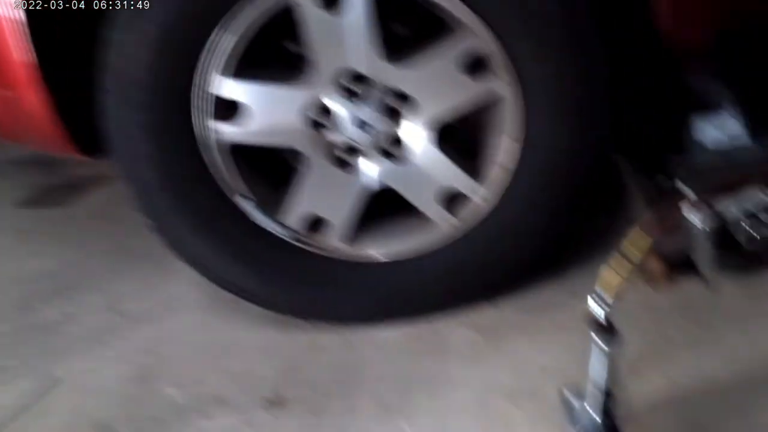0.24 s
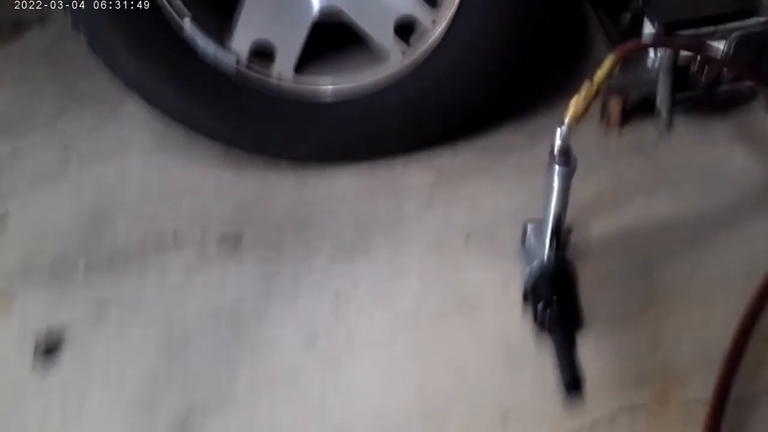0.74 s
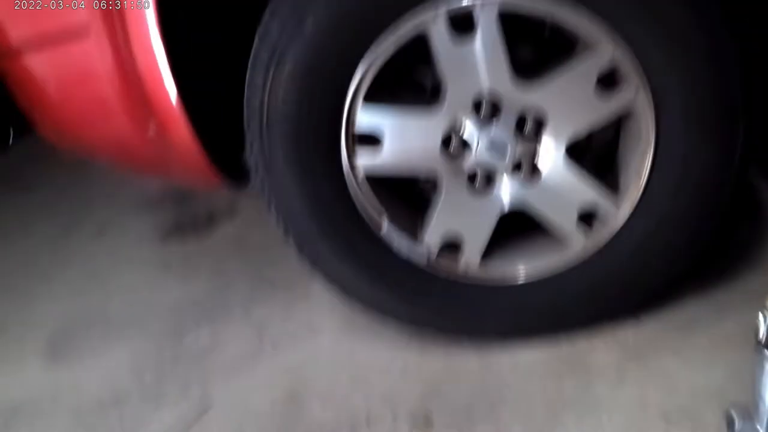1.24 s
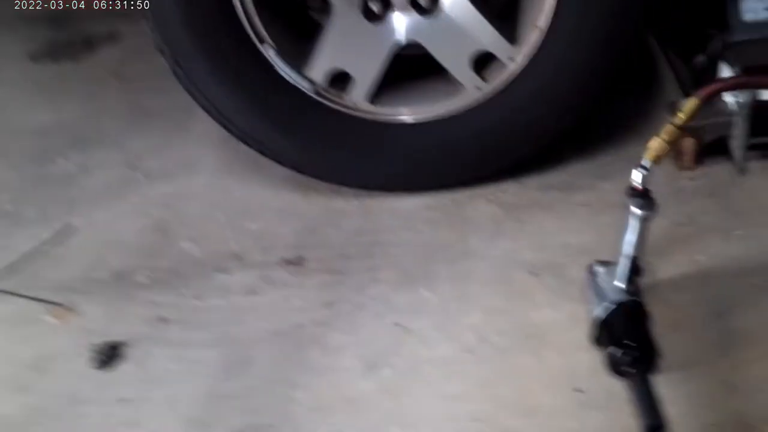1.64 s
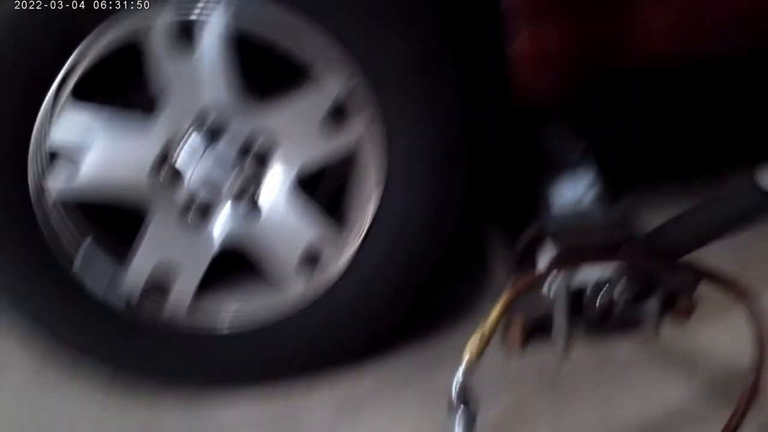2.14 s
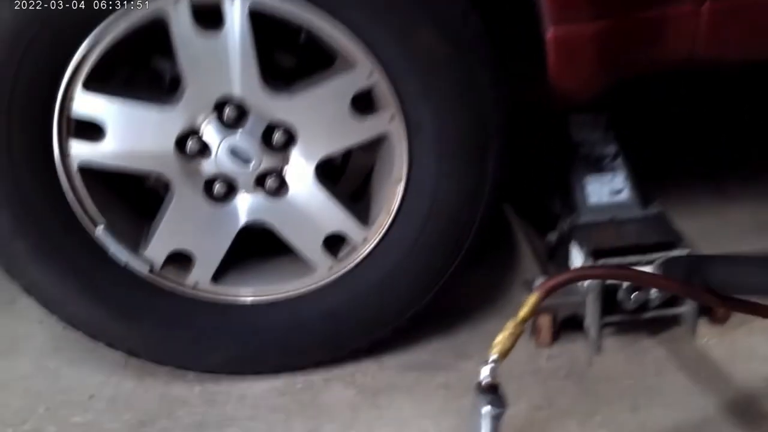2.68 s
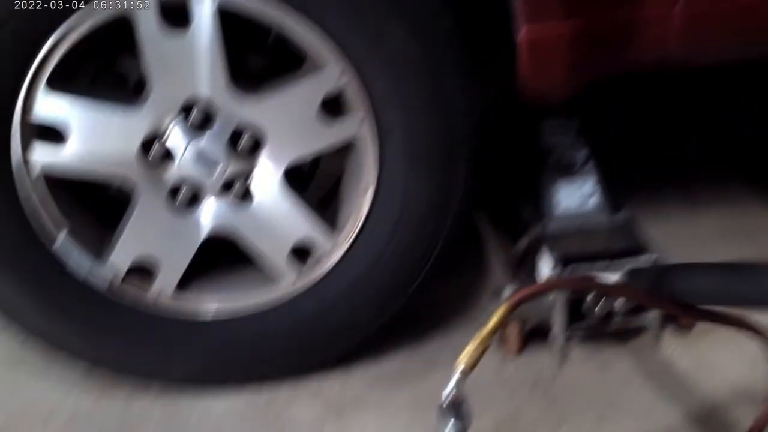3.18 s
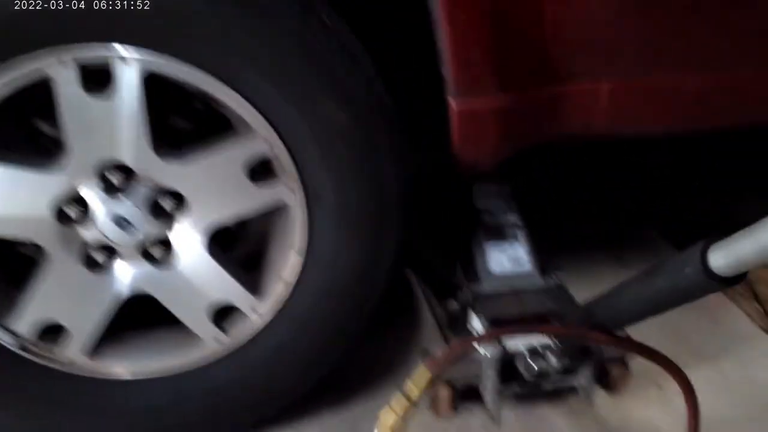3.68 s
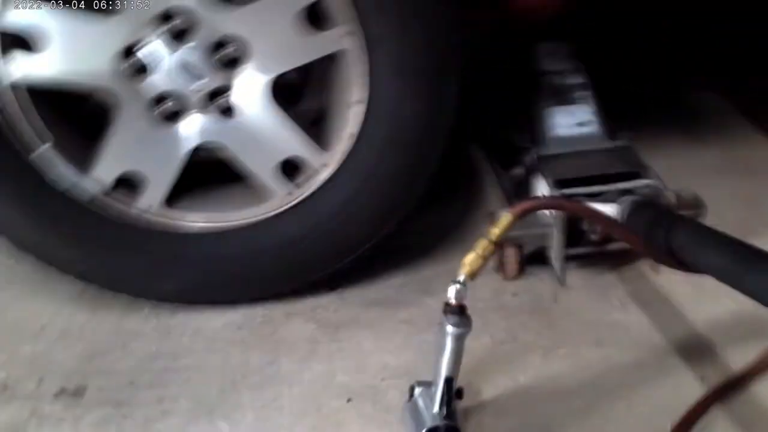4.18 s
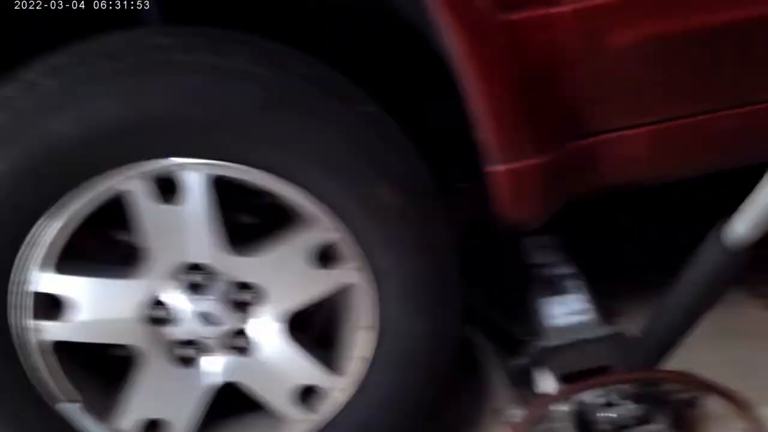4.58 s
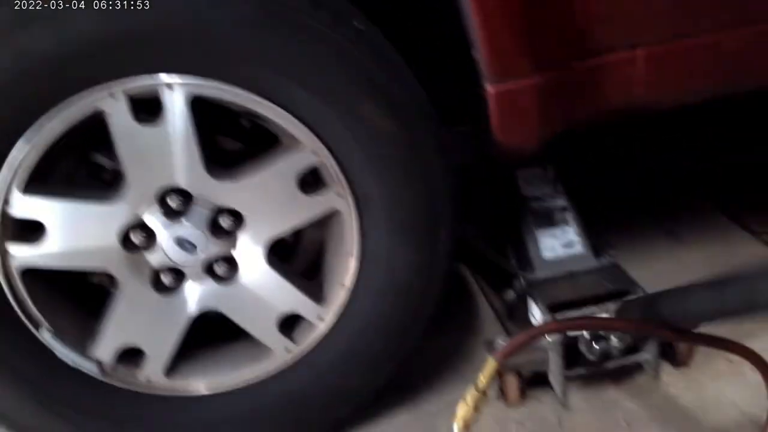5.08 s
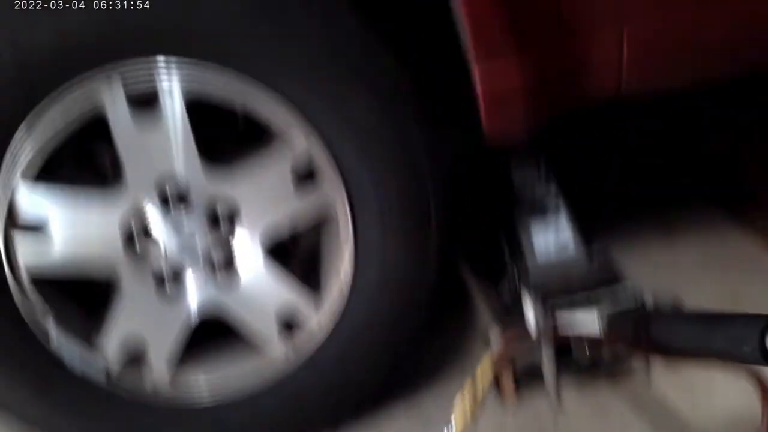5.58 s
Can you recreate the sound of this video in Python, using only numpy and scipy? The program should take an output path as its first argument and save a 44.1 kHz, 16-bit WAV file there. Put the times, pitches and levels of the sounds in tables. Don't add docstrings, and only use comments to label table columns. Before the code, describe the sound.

A hydraulic floor jack is pumped by hand beside a car in a concrete garage, heard close on a small handheld camera. A hollow handle knock opens at 0.1 s, followed by faint dry squeaking from 0.25 to 0.6 s. A soft knock at 0.7, a firm one at 1.25 and a dull one at 1.85 follow, with hand rustle and tiny ticks between. The hardest knock lands at 2.4 s, then light metal catches and a thin squeal until 2.8. Another knock at 3.5 precedes a loud, rapid steel clatter from 3.8 to 4.15 s. A far engine hum swells faintly near 4.3. A knock at 4.75 leads to a second, brighter, rattling burst from 5.0 to 5.3 s with a low thud. A small tick at 5.4 leaves hiss. Bumps are soft, the room tail short, and the treble coarse and unsteady.

```python
import sys
import numpy as np
from scipy import signal
from scipy.fft import rfft, irfft, next_fast_len
from scipy.io import wavfile
from scipy.ndimage import uniform_filter1d

SR = 44100
rng = np.random.default_rng(int(sys.argv[2]) if len(sys.argv) > 2 else 0)


def generate_wav(signal):
    frames = np.transpose(np.atleast_2d(signal))
    scaled = np.clip(frames, -1, 1) * 32767
    pcm = np.round(scaled).astype(np.int16)
    wavfile.write(sys.argv[1], SR, pcm)


def to_linear_factor(level_db):
    exponent = np.asarray(level_db, float) / 20
    return 10 ** exponent


N = 257103
T = np.arange(N) / SR


def unit(x):
    return x / np.sqrt(np.mean(x ** 2))


def noise(grit_db=0.):
    return unit(rng.standard_normal(N) * to_linear_factor(grit_db * rng.exponential(size=N)))


def ring(x, modes):
    out = 0
    for k, (hz, width_hz, db) in enumerate(modes):
        r = np.exp(-np.pi * width_hz / SR)
        poles = [1, -2 * r * np.cos(2 * np.pi * hz / SR), r * r]
        out = out + (-1) ** k * to_linear_factor(db) * (1 - r) * signal.lfilter([1, 0, -1], poles, x)
    return out


def body(x, modes, spread_hz):
    wide = [(hz, width_hz + spread_hz, db) for hz, width_hz, db in modes]
    response = ring(signal.unit_impulse(8192), wide)
    return ring(x, wide) / np.sqrt(np.sum(response ** 2))


def band(x, lo_hz, hi_hz):
    return signal.sosfilt(signal.butter(3, [lo_hz, hi_hz], "bandpass", fs=SR, output="sos"), x)


def column(tables, k, rest):
    out = np.full(N, float(rest))
    for rows in map(np.array, tables):
        on = (T >= rows[0, 0]) & (T <= rows[-1, 0])
        out[on] = np.interp(T[on], rows[:, 0], rows[:, k])
    return out


def gain(tables, k):
    return uniform_filter1d(to_linear_factor(column(tables, k, -120)), size=200)


def walk(rate_hz):
    hold = int(SR / rate_hz)
    return uniform_filter1d(np.repeat(rng.standard_normal(N // hold + 1), hold), hold)[:N]


def add(out, s, piece):
    i = int(s * SR)
    out[i:i + len(piece)] += piece[:N - i]


# start in seconds, peak in dB, ring in Hz, push in seconds,
# level under 1 kHz in dB.
KNOCKS = [
    (0.091, -20.5, 1780, 0.033, -12.5),
    (0.722, -34.5, 1480, 0.065, -11.5),
    (1.251, -18.5, 1780, 0.044, -14.5),
    (1.839, -29.5, 1200, 0.054, -26),
    (2.36, -13.5, 2030, 0.046, -24),
    (3.475, -16, 1354, 0.037, -26.5),
    (4.764, -24, 1440, 0.038, -16.5),
]
# centre in Hz, width in Hz, level in dB.
HANDLE_MODES = [(905, 61, 7.5), (1226, 210, 19.5), (1421, 15, 14), (1780, 10.6, -8), (1990, 90, 9),
                (2300, 41, 19.5), (3120, 140, -22), (4230, 44, -23)]


def knocks():
    out, t, chatter = np.zeros(N), T[:8192], noise(2.0)
    for s, db, hz, push_s, low_db in KNOCKS:
        push = np.exp(-(t / push_s) ** 2 * 2.0) + to_linear_factor(-1.5) * np.exp(-t / 0.026)
        hit = (1 - np.exp(-t / 0.0025)) * push * chatter[int(s * SR):][:8192]
        tube = body(hit, HANDLE_MODES, 27) + to_linear_factor(3.5) * body(hit, [(hz, 500, 0)], 0)
        low = to_linear_factor(low_db + 8.0) * body(hit, [(749, 300, 0)], 0)
        add(out, s - .003, to_linear_factor(db - 10.5) * (tube + low))
    return band(out, 300, 2700) + to_linear_factor(-22.0) * band(out, 2700, 3900)


# start in seconds, peak in dB, ping in Hz, saddle level in dB.
CATCH = [
    (2.6104, -19, 2620, -16),
    (2.6342, -18, 2420, -17),
    (2.6603, -31, 2700, -12),
]
SETTLE = [
    (2.7418, -21, 2440, -9),
]
FIRST_LOAD = [(3.802, -19, 2520, -7), (3.8125, -8, 2600, -6), (3.8292, -15, 2700, -15),
              (3.877, -20, 2430, -16), (3.8862, -12, 2330, -12), (3.9029, -10, 2330, -11),
              (3.916, -5, 2470, -11), (3.9374, -14, 2700, -15), (3.9587, -6, 2610, -23),
              (3.9685, 0, 2630, -25), (3.9818, -1, 2620, -21), (3.9987, 0, 2800, -19),
              (4.009, -5, 3450, -11), (4.0253, -7, 3450, -22), (4.0427, -18, 3600, -17),
              (4.0748, -19, 2660, -15), (4.0947, -13, 2470, -12), (4.1318, -8, 2710, -33)]
SECOND_LOAD = [(5.0214, -23, 2540, -15), (5.0339, -23, 2510, -11), (5.0628, -24, 2790, -15),
               (5.0848, -11, 2550, -19), (5.1102, -14, 2580, -17), (5.1228, -13, 2720, -13),
               (5.1285, -3, 3830, -11), (5.1336, -2, 3770, -13), (5.1387, -2, 3990, -8),
               (5.1476, -7, 4060, -6), (5.1597, -6, 3420, -9), (5.176, -6, 3160, -15),
               (5.1844, -5, 3040, -14), (5.2116, -14, 2740, -11), (5.2361, -5, 2690, -13),
               (5.2515, -9, 2420, -11)]
PINS_DB = [
    -41,
    -16.5,
    -16.5,
    -10,
]


def slips_and_rebounds():
    rebound_s, rebound_db, rebound_scatter_db = .0075, -6.5, 1.5
    pitch_scatter, pins_scatter_db = .05, 3.5
    brighter_per_db = 0.24
    bouts = zip([CATCH, SETTLE, FIRST_LOAD, SECOND_LOAD], PINS_DB)
    first = np.array([tuple(row) + (pins_db,) for bout, pins_db in bouts for row in bout])
    chance, k = rng.standard_normal((len(first), 4, 4)), np.arange(4)
    later = np.append(first[1:, 0], T[-1]) - rebound_s / 2
    rows = []
    for (s, db, hz, saddle_db, pins_db), c, stop in zip(first, chance, later):
        loose = c * (k > 0)[:, None]
        when = s + np.cumsum((k > 0) * rebound_s * np.exp(.25 * c[:, 0]))
        level_db = db + rebound_db * k + rebound_scatter_db * loose[:, 1]
        ping_hz = hz * (1 + pitch_scatter * loose[:, 2])
        rattle_db = pins_db + brighter_per_db * (db + 12) + pins_scatter_db * c[:, 3]
        table = np.c_[when, level_db, ping_hz, saddle_db + 1.5 * k, rattle_db]
        rows += list(table[(when < stop) | (k == 0)])
    return rows


# time in seconds, level in dB.
GRIND = [
    [(2.59, -49), (2.624, -31.5), (2.8, -56)],
    [(3.25, -66), (3.27, -35.5), (3.32, -49.5)],
    [(3.77, -34), (3.808, -26), (4.138, -41.5), (4.2, -34)],
    [(4.99, -43), (5.14, -12.5), (5.32, -34.5)],
]
GRIND_THUMP_DB = [
    -8,
    -10.5,
    -23.5,
    -20.5,
]
# centre in Hz, width in Hz, level in dB.
FRAME_MODES = [(1790, 150, -9), (2830, 140, -4.5), (3460, 70, -5), (4570, 46, -22), (4100, 82, -15),
               (4444, 50, -3.5)]
SADDLE_MODES = [(540, 32, 17), (1034, 110.7, 1.5)]
PIN_MODES = [(5310, 150, 7), (5870, 130, 11.5), (6090, 34, 14), (6270, 12, 9), (6400, 220, -19),
             (6830, 150, 9), (8495, 400, 10.5), (7610, 370, 10.5), (10300, 50, -28)]


def clatter():
    loaded_s, hard_hz, dull_hz = 3.5, 3300, 8540
    near, t, grit = np.zeros(N), T[:2048], noise(2.8)
    to_frame, to_saddle, to_upper, to_pins = np.zeros((4, N))
    for s, db, hz, saddle_db, pins_db in slips_and_rebounds():
        loaded = s > loaded_s
        contact_s = .0002 if loaded else .0008
        ping = (1 - np.exp(-t / contact_s)) * np.exp(-t / (3.5 * contact_s)) * (1 if loaded else .7)
        add(near, s, to_linear_factor(db + 6.5) * ping * np.sin(2 * np.pi * hz * t))
        shake = to_linear_factor(.8 * db)
        chatter = body(np.exp(-t / 0.0076) * grit[int(s * SR):][:2048], [(hz, 350, 0)], 0)
        add(near, s, shake * to_linear_factor(-13) * chatter)
        add(to_frame, s, shake * to_linear_factor(-19.0) * np.exp(-t / 0.0078))
        seat = to_upper if hz > hard_hz else to_saddle
        add(seat, s, shake * to_linear_factor(saddle_db - 3.5) * np.exp(-t / 0.0049))
        add(to_pins, s, shake * to_linear_factor(pins_db - 0.5) * (ping + to_linear_factor(-10.5) * np.exp(-t / 0.0078)))
    grind = gain(GRIND, 1)
    floor_bouts = [[(s, db + extra_db) for s, db in bout] for bout, extra_db in zip(GRIND, GRIND_THUMP_DB)]
    frame = body((to_frame + to_linear_factor(-11.5) * grind) * noise(2.5), list(FRAME_MODES) + [(2212, 180, -3.5)], 60)
    saddle = body((to_saddle + to_linear_factor(-21) * grind) * noise(2.3), SADDLE_MODES, 14)
    upper_modes = [(1016, 41, -1), (1145, 78, -3.5), (765, 400, -2.0)]
    upper = to_linear_factor(2.5) * body(to_upper * noise(3.5), upper_modes, 29)
    pins = body((to_pins + to_linear_factor(-30) * grind) * noise(1.7), PIN_MODES, 170)
    floor_modes = [(204.6, 40, 7.0), (155, 68, 0.5), (88.0, 69, -0.5)]
    thump = gain(floor_bouts, 1) * unit(ring(noise(), floor_modes))
    bright = signal.lfilter(*signal.butter(2, dull_hz, fs=SR), near + pins)
    return bright + frame + saddle + upper + thump


# start in seconds, peak in dB, ring in Hz, treble ring in Hz, treble level in dB.
TICKS = [(1.5108, -46, 1440, 7850, 11), (1.576, -33.5, 4550, 6040, -7.5), (1.613, -32.5, 2300, 5800, -7),
         (1.666, -31, 764, 5960, -22), (1.6775, -30, 4260, 7330, -8.5), (1.8379, -30, 1225, 6000, -6.5),
         (2.866, -41, 2850, 6100, -4.5), (2.9633, -36, 2770, 6090, -32), (3.2644, -23.5, 2307, 5600, -32),
         (4.9606, -36, 3010, 6200, -17), (5.431, -29.5, 2720, 6600, -12)]


def ticks():
    out, t, grit, t60_s = np.zeros(N), T[:4096], noise(1.3), .1
    for s, db, hz, high_hz, high_db in TICKS:
        decay = np.exp(-np.log(1000) * t / t60_s)
        hit = (1 - np.exp(-t / 0.00037)) * decay * grit[int(s * SR):][:4096]
        modes = [(hz, 120, 0), (1.32 * hz, 250, -8), (0.87 * hz, 150, -8), (0.51 * hz, 150, -10)]
        middle = ring(body(hit, modes, 0), [(hz, 1.2 * hz, 0)])
        treble = to_linear_factor(high_db) * body(hit, [(high_hz, 700, 0)], 0)
        add(out, s, to_linear_factor(db - 4) * (middle + treble))
    return out


# start in seconds, end in seconds, level in dB.
SQUEALS = [
    [(.33, .59, -46), (2.53, 2.72, -50)],
    [(.42, .6, -61), (1.34, 1.72, -59), (2.5, 2.8, -57)],
    [(.24, .56, -55), (1.56, 1.72, -58), (2.6, 2.8, -62), (3.58, 3.67, -60), (4.4, 4.46, -62)],
    [(.68, .86, -61)],
]
# centre in Hz, width in Hz, level in dB.
SQUEAL_MODES = [
    [(2720, 50, 2.5), (3010, 60, -9.5), (4440, 120, -11), (1456, 95, -12)],
    [(7330, 27, 0)],
    [(8120, 160, 0), (8500, 80, -4)],
    [(6150, 60, 0)],
]


def squeal():
    rise_s, fall_s, edge_db = .07, .04, -12
    out = 0
    for rows, modes in zip(SQUEALS, SQUEAL_MODES):
        shapes = []
        for s, e, db in rows:
            risen_s = s + rise_s
            hold_end_s = max(e - fall_s, risen_s)
            shapes.append([(s, db + edge_db), (risen_s, db), (hold_end_s, db), (e, db + edge_db)])
        stick_slip = to_linear_factor(4.5 * walk(40)) * noise(1.5)
        out = out + gain(shapes, 1) * body(stick_slip, modes, 0)
    return out


# start in seconds, peak in dB, pitch in Hz.
BUMPS = [(0.269, -44.5, 215), (0.725, -45.5, 322), (1.047, -43, 158), (1.857, -42, 166), (2.36, -43, 187),
         (2.609, -36.5, 116), (3.283, -41.5, 145), (4.3, -46, 196), (4.545, -41.5, 289.5),
         (5.79, -40.5, 327)]


def bumps():
    out, t = np.zeros(N), T[:2048]
    lift = (5.122, -33, 55)
    for s, db, hz in list(BUMPS) + [lift]:
        swell = t / .012 * np.exp(1 - t / 0.0094)
        add(out, s, to_linear_factor(db - 1.5) * swell * np.sin(2 * np.pi * hz * t * (1 + 1.2 * t)))
    return out


# time in seconds, level
# in dB.
RUSTLE = [(0.0, -42.5), (0.81, -44), (1.15, -40.5), (1.29, -35.5), (1.52, -43), (1.64, -35.5), (1.74, -44),
          (1.93, -46), (3.82, -47), (3.99, -31.5), (4.16, -47), (5.83, -46)]


def rustle():
    level = gain([RUSTLE], 1)
    low = level * to_linear_factor(-12 + 3.2 * walk(25)) * unit(band(noise(), 130, 613))
    patches = 0
    for hz in np.linspace(800, 5000, num=11):
        patches = patches + to_linear_factor(6.0 * walk(35)) * body(noise(), [(hz, 140, 0)], 0)
    return to_linear_factor(-6) * (low + level * unit(band(patches, 600, 5200)))


# time in seconds, firing rate in Hz, level in dB.
ENGINE = [
    [(0.0, 69.8, -61), (0.37, 83.7, -59), (1.25, 99.75, -58.5), (2.6, 116.8, -74.5)],
    [(3.9, 79.2, -79), (4.312, 83.6, -46.5), (4.534, 86.4, -61), (5.83, 100.7, -65.5)],
]
# time in seconds, level in dB.
RUMBLE = [(0.0, -63), (1.1, -57), (1.8, -66), (5.83, -74)]


def street():
    firing_hz = column(ENGINE, 1, 100) * (1 + 0.018 * walk(47))
    phase = 2 * np.pi * np.cumsum(firing_hz) / SR
    level = np.sqrt(2) * gain(ENGINE, 2) * to_linear_factor(3.5 * walk(8.2))
    note = level * (np.sin(phase) + to_linear_factor(-13) * np.sin(2 * phase))
    return note + gain([RUMBLE], 1) * unit(band(noise(), 47, 78))


# frequency in Hz, density in dB per Hz.
HISS = [(18, -50.5), (92, -2.5), (500, -0.5), (3400, -3), (5590, -12.5), (10700, -24), (11500, 7),
        (22000, -120)]


def hiss():
    size = next_fast_len(N)
    hz = np.fft.rfftfreq(size, 1 / SR) + 1
    knot_hz, knot_db = np.array(HISS).T
    colour = to_linear_factor(np.interp(np.log(hz), np.log(knot_hz), knot_db)) * rfft(noise(), size)
    out = 0
    for octave in np.arange(4, 14.1, .5):
        share = np.clip(1 - 2 * abs(np.log2(hz) - octave), 0, 1)
        out = out + to_linear_factor(2.66 * walk(22)) * irfft(colour * share, size)[:N]
    return to_linear_factor(-47) * unit(out)


def garage(x):
    t60_s, level_db, t = 0.17, -31, T[:SR // 2]
    tail = rng.standard_normal(len(t)) * np.exp(-np.log(1000) * t / t60_s) * (t > .004)
    return x + to_linear_factor(level_db) * signal.fftconvolve(x, tail / np.sqrt(np.sum(tail ** 2)))[:N]


def scene():
    jack = garage(knocks() + clatter() + ticks() + squeal())
    return (jack + bumps() + rustle() + street() + hiss())[None]


# start in seconds, end in seconds, share of frames.
STARVED = [(.38, .45, .7), (.66, .87, .6), (1.17, 1.49, .5), (2.83, 2.9, .7), (2.915, 2.955, 1),
           (3.32, 3.71, .7), (4.0, 4.03, 1), (4.26, 4.39, .7), (4.69, 4.93, .6), (5.225, 5.27, 1),
           (5.36, 5.83, .25)]


def coarse_detail(x):
    hop, first = 941, 255
    calm, busy, gap = 1.8, .55, 3.1
    gap_hz, fine_hz, starved_else = 5300, 900, .06
    n, k = np.arange(2 * hop) + .5, np.arange(hop) + .5
    hz = k * SR / 2 / hop
    window = np.sqrt(2 / hop) * np.sin(np.pi * n / (2 * hop))
    basis = window[:, None] * np.cos(np.pi / hop * np.outer(n + hop / 2, k))
    count = N // hop + 3
    padded = np.pad(x, (2 * hop - first, count * hop))
    blocks = padded[:(count + 1) * hop].reshape(-1, hop)
    frames = np.hstack([blocks[:-1], blocks[1:]])
    lines = frames @ basis

    share = np.where(abs(frames).max(1) > to_linear_factor(-24), busy, calm)[:, None]
    share = share * to_linear_factor(.8 * rng.standard_normal((count, 1)))
    share = share * np.clip(hz / fine_hz, .3, 1)
    when, odds = ((np.arange(count) - 1) * hop + first) / SR, np.full(count, starved_else)
    for s, e, part in STARVED:
        odds[(when >= s) & (when <= e)] = part
    short = rng.random(count) < np.where((share[:, -1] < 1) & (odds < 1), 0, odds)
    starved = np.flatnonzero(short & (~np.roll(short, 1) | (odds == 1)))
    share[starved] *= np.where(share[starved, -1:] < 1, calm / busy, 1)
    treble = hz > gap_hz
    share[np.ix_(starved, treble)] = gap * np.sqrt(hz / gap_hz)[treble]

    step = share * np.sqrt(uniform_filter1d(lines ** 2, size=24, axis=1)) + 1e-9
    back = (np.sign(lines) * np.floor(abs(lines) / step + .4) * step) @ basis.T
    out = np.vstack([back[:, :hop], 0 * k]) + np.vstack([0 * k, back[:, hop:]])
    return out.ravel()[2 * hop - first:][:N]


def roll_off(x):
    return signal.sosfilt(signal.butter(12, 15740, fs=SR, output="sos"), x)


def record(dry):
    top_hz, knee, headroom = 10800, .8, .19
    low_pass = signal.ellip(10, .2, 80, top_hz, fs=SR, output="sos")
    cut = signal.sosfilt(low_pass, coarse_detail(dry[0]))
    over = np.maximum(abs(cut) - knee, 0)
    rounded = cut - np.sign(cut) * (over - headroom * np.tanh(over / headroom))
    return roll_off(rounded[None])


dry = scene()
out = record(dry)
generate_wav(out)
```